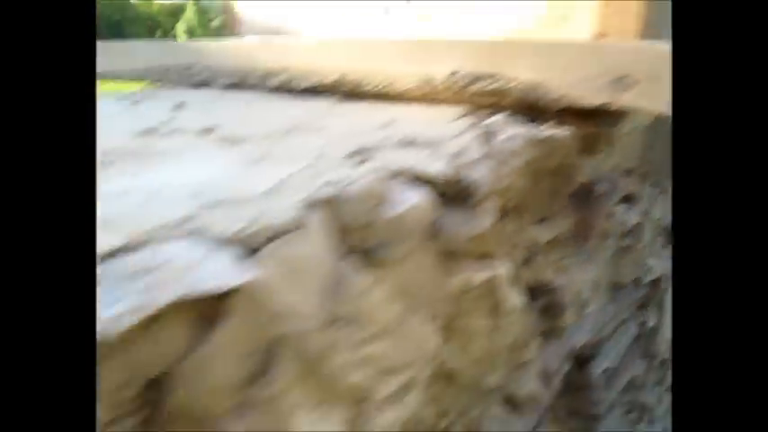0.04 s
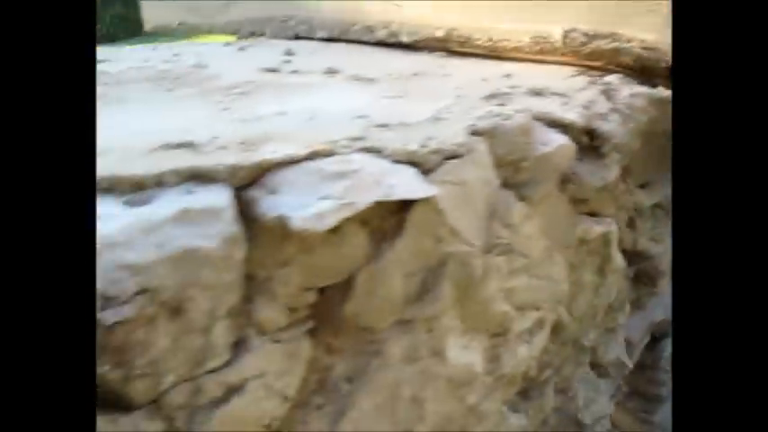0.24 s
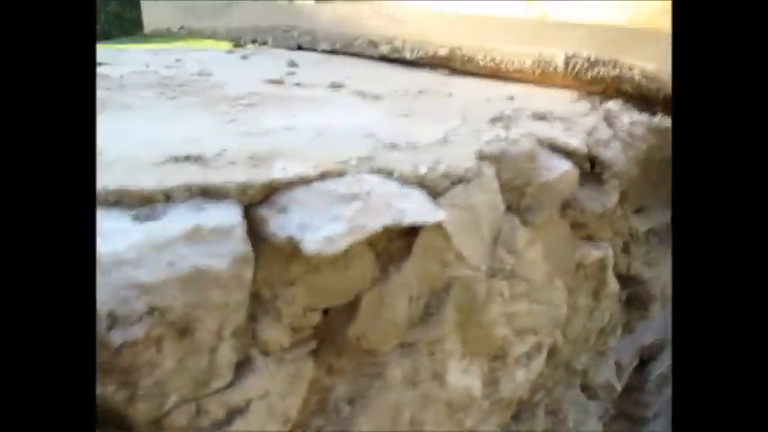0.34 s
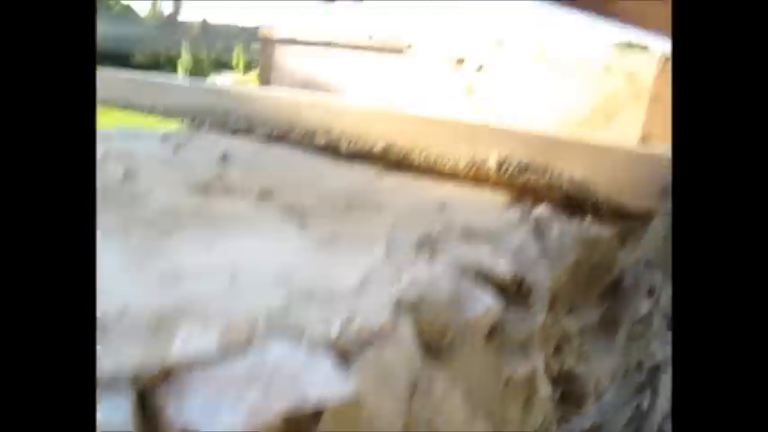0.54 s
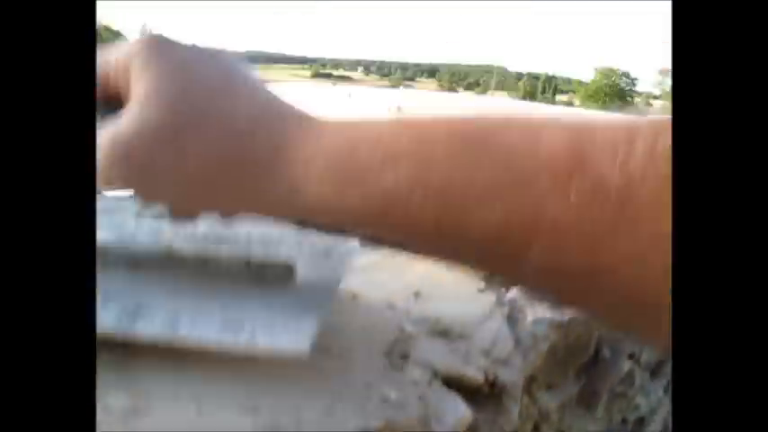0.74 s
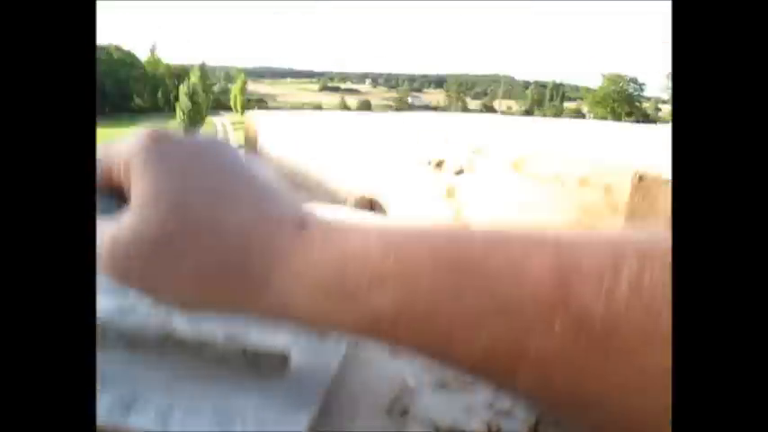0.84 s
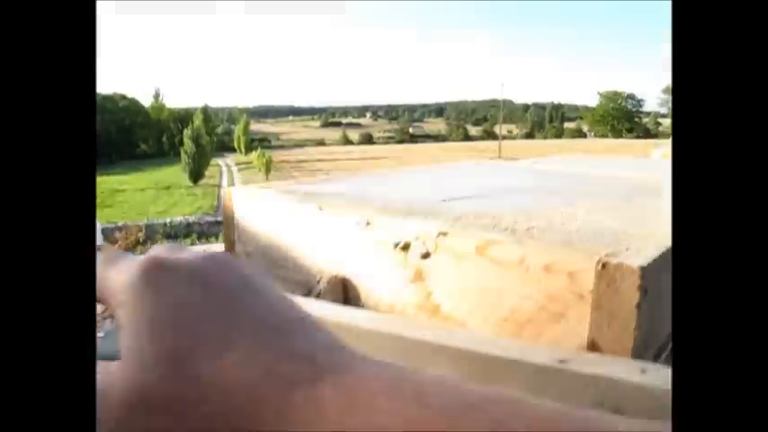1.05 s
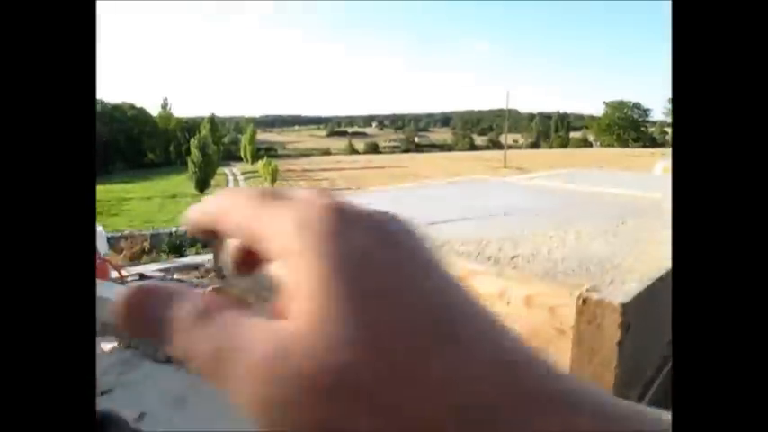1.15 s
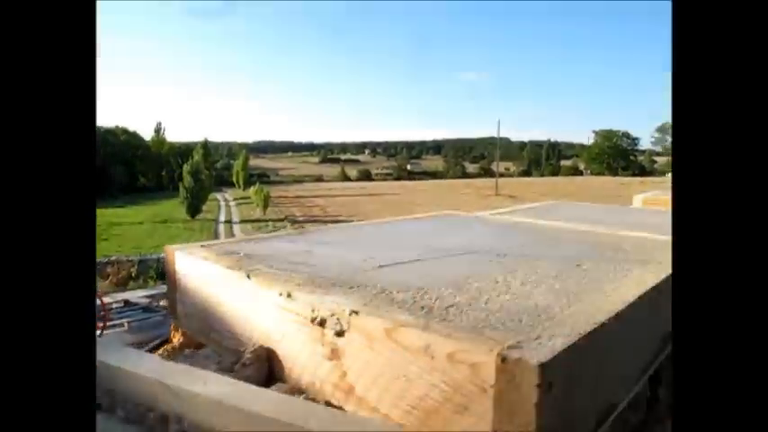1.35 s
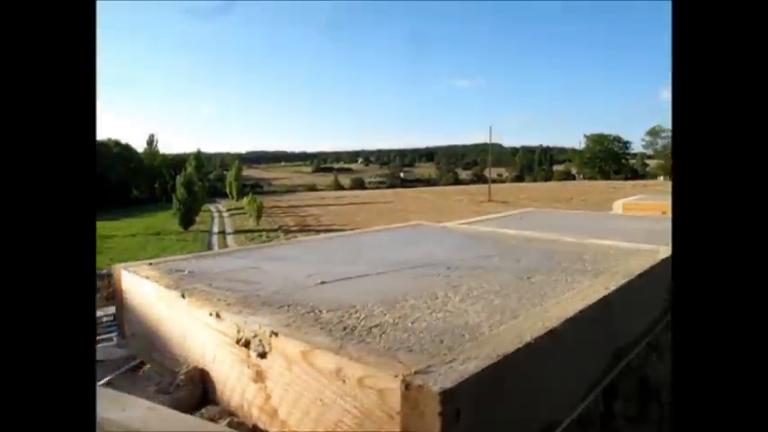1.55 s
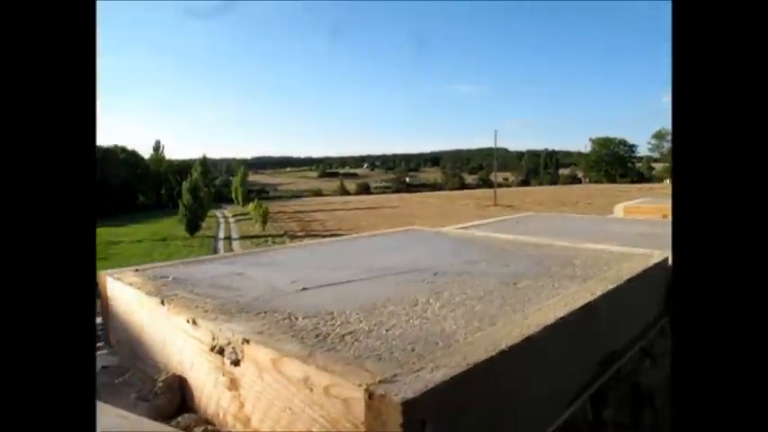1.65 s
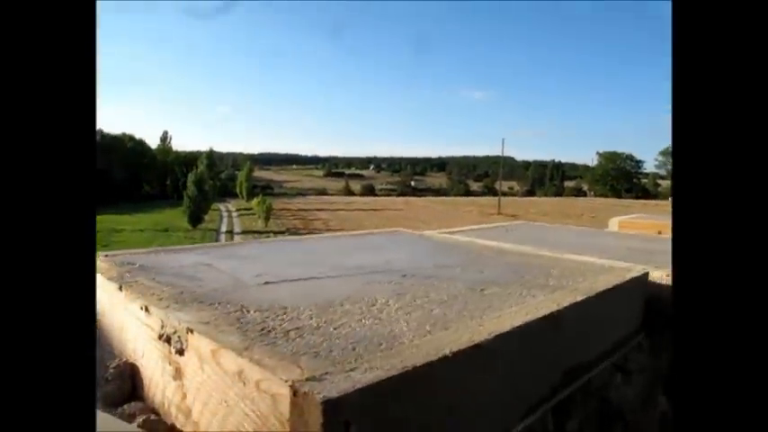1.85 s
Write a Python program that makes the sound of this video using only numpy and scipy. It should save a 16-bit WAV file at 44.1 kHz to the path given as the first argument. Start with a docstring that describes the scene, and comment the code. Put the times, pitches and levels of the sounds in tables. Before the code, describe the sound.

A board scrapes close by over a rough stone wall from about 0.2 to 0.4 seconds, crunching grit with tiny squeaks and a judder, then rings briefly. At 0.75 it lands with a sharp knock and rocks with fading clacks, stone ticks and soft bumps until 1.4. A distant bird chirps faintly near 1.6. A low outdoor hush and a very faint high whine run throughout.

```python
"""In quiet open country, a long straight-edged board is dragged over the rough top of a stone wall. Grit
crunches under it; the edge snags and squeaks, and the board judders and rings on as it lifts off. It is set
down with a sharp knock, shifts, and rocks to rest with dull clacks and soft bumps. Chips of stone tick, one far
bird chirps, and a faint high whine holds steady throughout."""
import sys
import numpy as np
from scipy import signal
from scipy.fft import rfft, irfft, next_fast_len
from scipy.io import wavfile
from scipy.ndimage import uniform_filter1d

SR = 44100
rng = np.random.default_rng(int(sys.argv[2]) if len(sys.argv) > 2 else 0)


def int16_out(signal):
    """Quantize to a 16-bit WAV file."""
    q = np.round(np.clip(np.atleast_2d(signal).T, -1, 1) * 32767)
    wavfile.write(sys.argv[1], SR, q.astype(np.int16))


N = 83790


def amp(db):
    """Turn decibels into a gain."""
    return 10 ** (np.asarray(db) / 20)

def unit(x):
    """Scale a sound to an average (rms) level of 1."""
    return x / np.sqrt(np.mean(x ** 2) + 1e-20)

def clock():
    """The time of each sample, in seconds."""
    return np.arange(N) / SR

def filtered(x, response):
    """Multiply each frequency in x by response(hz)."""
    size = next_fast_len(N + 8192)
    return irfft(rfft(x, size) * response(np.fft.rfftfreq(size, 1 / SR)), size)[:N]

def coloured(x, colour):
    """Shape x by a tone colour, a list of (Hz, dB) points; the result has level 1."""
    freqs, db = np.transpose(colour)
    def response(hz):
        bass_cut = np.minimum(1, hz / freqs[0]) ** 2
        return amp(np.interp(np.log(hz + 1), np.log(freqs), db)) * bass_cut
    return unit(filtered(x, response))

def noise():
    """White noise: an even hiss."""
    return rng.standard_normal(N)

def band(centre_hz, octaves):
    """Noise gathered around one pitch."""
    return unit(filtered(noise(), lambda hz: np.exp(-.5 * (np.log2((hz + 1) / centre_hz) / octaves) ** 2)))

def swell(peak_s, width_s):
    """A level that rises and falls in a bell shape."""
    return np.exp(-.5 * ((clock() - peak_s) / width_s) ** 2)

def decay(start, fade_s, hold_s=0):
    """A level that jumps up, holds, then dies. A fade time is how long a drop of 60 dB takes."""
    age = clock() - start
    return (age >= 0) * np.exp(-np.log(1000) * np.maximum(age - hold_s, 0) / fade_s)


# The air's tone colour. Each row: frequency in Hz, relative level in dB.
AIR_COLOUR = [(15, -25), (25, 0.5), (117, -6.5), (260, -4), (545, -6), (1650, -9), (4610, -13.5),
              (10100, -17), (16000, -34.5)]
def still_air():
    """The low, steady hush of open country."""
    return amp(-59.5) * coloured(noise(), AIR_COLOUR)

def whine(hz=5880):
    """One faint, steady high tone."""
    return amp(-76) * unit(np.sin(2 * np.pi * hz * clock()))

def grains(per_second=9000, spread=0.33):
    """Grit breaking: a stream of tiny cracks of uneven size."""
    size = rng.choice([-1, 1], N) * np.exp(spread * np.clip(noise(), -2, 2))
    return size * (rng.random(N) < per_second / SR)

# How loud the drag is as it goes. Each row: time in seconds, then grit, rasp and judder levels in dB.
STROKE_LEVELS = [(0.2122, -58.5, -71, -69), (0.211, -24.5, -36.5, -37), (0.219, -27.5, -41, -35.5),
                 (0.2245, -31.5, -39, -49.5), (0.23, -24, -29, -39.5), (0.248, -26.5, -45, -37.5),
                 (0.263, -29.5, -47, -46.5), (.290, -26.5, -33, -33.5), (0.304, -23.5, -34, -30),
                 (0.322, -22, -23.5, -33), (0.329, -28.5, -36.5, -36.5), (0.349, -21.5, -28.5, -28),
                 (0.371, -22.5, -31, -14), (0.373, -16.5, -27.5, -20.5), (0.387, -23, -30.5, -23),
                 (.393, -37.5, -34, -31.5), (0.424, -67, -59, -71.5)]
# Tone colours of the drag, highest first. Each row: frequency in Hz, relative level in dB.
GRIT_COLOUR = [(2000, -13), (4200, -9.5), (5200, -7.5), (7000, -3), (9500, 2.5), (10600, -3.5),
               (11800, -19), (12600, -12), (16000, -20.5)]
RASP_COLOUR = [(1200, -7), (1500, -7.5), (1950, -16), (2600, 1.5), (3000, -9), (3550, 1.5), (4200, -2),
               (5000, -21.5), (9000, -41.5)]
JUDDER_COLOUR = [(130, -71), (260, -29), (400, -22.5), (580, -9), (780, -12.5), (1000, -8.5), (1220, 5.5),
                 (1380, -13), (1650, -33), (3000, -36)]
RUMBLE_COLOUR = [(25, -17.5), (100, -10.5), (230, -0.5), (480, 1), (900, -23), (2000, -42.5)]
def scrape():
    """Grit breaks under the moving edge, which snags while the board judders and rings."""
    times, *levels = np.transpose(STROKE_LEVELS)
    grit, rasp, judder = [amp(np.interp(clock(), times, db, left=-120, right=-120)) for db in levels]
    jerk = amp(2.5 * unit(uniform_filter1d(noise(), size=130)))  # a fast flicker in level
    out = jerk * (grit * coloured(grains(), GRIT_COLOUR) + rasp * coloured(grains(), RASP_COLOUR))
    out += judder * coloured(grains(), JUDDER_COLOUR)
    usual_grit = np.median(grit[grit > grit.max() / 10])
    rumble = amp(-50.5) * np.sqrt(np.minimum(grit / usual_grit, 1))
    out += rumble * coloured(noise(), RUMBLE_COLOUR)
    return out + snags() + board_ring(judder)

# The tones of the board held in the air. Each row: pitch in Hz, relative level in dB, fade in seconds.
HELD_TONES = [(240, -20, .8), (581, -15, .45), (856, -2, .46), (921, -11, .48), (1157, -5, .35),
              (1206, -5, .27), (1270, -4, .2), (1453, -9, .46), (1502, -7, .32), (1906, -12, .27),
              (3305, -8, .15), (3480, -2, .1), (3700, 2, .085), (4199, -8, .12)]
def board_ring(judder, level_db=-31.5):
    """The judder feeds the board's own tones, which ring on after it lifts off."""
    out = np.zeros(N)
    for hz, db, fade_s in HELD_TONES:
        kept_per_sample = np.exp(-2 * np.log(1000) / (fade_s * SR))
        energy = signal.lfilter([1], [1, -kept_per_sample], judder ** 2)
        tone = np.sin(2 * np.pi * (hz * clock() + rng.random()))
        out += amp(level_db + db) * np.sqrt(energy / energy.max()) * tone
    return out

# A snag's tone colour. Each row: frequency in Hz, relative level in dB.
SNAG_COLOUR = [(800, -29.5), (1800, -17), (2800, -26.5), (5000, -15), (7200, 0.5), (10200, 1.5),
               (11800, -11), (12800, -13), (16000, -16.5)]
# The snags. Each row: time in seconds, level in dB, width in seconds, rasp relative to the crack in dB.
EDGE_SNAGS = [(0.2355, -21, 0.0018, -17), (0.25, -18, 0.0014, -16.5), (0.2574, -23.5, 0.0019, -2.5),
              (0.2742, -22, 0.0015, -9.5), (0.306, -11.5, .0008, -9.5), (0.323, -16.5, .0018, -3),
              (0.3263, -13, 0.00051, -19), (0.375, -21.5, 0.00064, -9.5), (.379, -19.5, .0011, -11.5),
              (.3862, -24.5, 0.0031, -5)]
def snags():
    """The edge catches on large grains, each giving a crack with some rasp in it."""
    crack, rasp = coloured(noise(), SNAG_COLOUR), coloured(noise(), RASP_COLOUR)
    return sum(amp(db) * swell(at, width_s) * (crack + amp(rasp_db) * rasp)
               for at, db, width_s, rasp_db in EDGE_SNAGS)

# The squeaks. Each row: time in seconds, level in dB, pitch in Hz.
EDGE_SQUEAKS = [(.2735, -27, 13500), (.3075, -27, 13000), (.326, -20, 10100), (.3735, -19, 7050)]
def squeaks():
    """Some snags give a shrill squeak as they slip."""
    return sum(amp(db) * swell(at, width_s=.0012) * band(hz, octaves=.063) for at, db, hz in EDGE_SQUEAKS)

def swish():
    """A faint hiss swells before the knock."""
    return amp(-57) * swell(peak_s=.699, width_s=.026) * coloured(noise(), GRIT_COLOUR)

# The ticks. Each row: start in seconds, level in dB, pitch in Hz, width in octaves, fade in seconds.
CHIP_TICKS = [(.727, -41.5, 925, 1, 0.016), (0.898, -24.5, 4200, .36, 0.011),
              (1.1028, -28.5, 8040, 0.21, 0.0097), (1.796, -48.5, 1430, 0.43, 0.019)]
def ticks():
    """Loose chips of stone click once without ringing."""
    return sum(amp(db) * decay(start, fade_s) * band(hz, octaves)
               for start, db, hz, octaves, fade_s in CHIP_TICKS)

def struck(start, tones, detune=.004):
    """A hit sets the board's tones ringing; they shift a little with the point of contact."""
    t, out = clock(), np.zeros(N)
    ringing = (t >= start) & (t < start + .3)
    age = t[ringing] - start
    for hz, db, fade_s in tones:
        level = amp(db + rng.normal(0, 1.37)) * np.exp(-np.log(1000) * age / fade_s)
        out[ringing] += level * np.sin(2 * np.pi * (hz * rng.normal(1, detune) * age + rng.random()))
    return out

def softened(ring, start, bright_hz, rise_s=.00094):
    """A hit takes a moment to build up, and its treble falls away above bright_hz."""
    rise = 1 - np.exp(-np.maximum(clock() - start, 0) / rise_s)
    return filtered(ring * rise, lambda hz: 1 / np.sqrt(1 + (hz / bright_hz) ** 5))

# The tones of the board lying on the wall. Each row: pitch in Hz, relative level in dB, fade in seconds.
LYING_TONES = [(690, -16, .11), (852, -12, .13), (1178, -2, .15), (1273, -1, .13), (1545, -10, .12),
               (1712, -4, .12), (2164, -7, .05), (2538, -5, .11), (2775, 1.5, .07), (3303, -1, .09),
               (3385, 0, .07), (3450, 0, .06), (3612, -7, .11), (3790, -8, .11), (4355, -10, .08)]
# Tone colours of the knock and the crushed grit. Each row: frequency in Hz, relative level in dB.
KNOCK_COLOUR = [(60, -38), (450, -38), (650, -12.5), (1250, -2.5), (1800, -11), (2500, -7), (3500, 4),
                (4300, -7), (7000, -13), (12000, -30)]
CRUNCH_COLOUR = [(800, -37), (3000, -4), (5500, -5), (7600, 1), (10000, -2), (11800, -16.5), (13000, -19),
                 (16000, -27)]
# The board strikes the wall. Each row: start in seconds, relative ring level in dB, brightness in Hz,
# crunch level in dB, time the crunch holds in seconds.
WALL_KNOCKS = [(.752, -21.5, 9000, -19.5, 0.006), (.756, -19.5, 4630, -34.5, 0.0057),
               (0.779, -30.5, 4560, -41, 0.011), (0.798, -36, 4500, -40, 0.0054),
               (.805, -29.5, 4470, -38.5, 0.0053), (0.8603, -36, 5500, -39.5, .002),
               (.884, -33, 5000, -37.5, 0.0081), (0.9, -30.5, 4340, -39.5, 0.01),
               (0.919, -29.5, 1760, -46, 0.01), (0.944, -28, 1700, -45.5, 0.006)]
def knocks():
    """Each knock rings the board and crushes a little grit."""
    out = np.zeros(N)
    crunch = coloured(grains(), CRUNCH_COLOUR)
    for start, db, bright_hz, crunch_db, hold_s in WALL_KNOCKS:
        body = amp(-2.5) * decay(start, fade_s=.075) * coloured(noise(), KNOCK_COLOUR)
        tones = amp(-8.5) * struck(start, LYING_TONES)
        out += amp(db) * softened(body + tones, start, bright_hz)
        out += amp(crunch_db) * decay(start, fade_s=.031, hold_s=hold_s) * crunch
    return out

# The bumps. Each row: start in seconds, level in dB, pitch in Hz.
SOFT_BUMPS = [(0.895, -50.5, 270), (1.381, -57.5, 205), (1.443, -56.5, 420)]
def bumps(rise_s=.011):
    """The board gives dull, soft bumps as it settles."""
    out = np.zeros(N)
    for start, db, hz in SOFT_BUMPS:
        progress = np.maximum(clock() - start, 0) / rise_s  # loudest at 1
        out += amp(db) * progress * np.exp(1 - progress) * band(hz, octaves=.53)
    return out

# The tones of the rocking board. Each row: pitch in Hz, relative level in dB, fade in seconds.
ROCKING_TONES = [(744, -17, 0.14), (955, -17, 0.24), (1136, -6.5, 0.1), (1210.6, 0, 0.12),
                 (1331, -6.5, 0.097), (1406, -7, 0.13), (1527, -12.5, 0.23), (1686, -9.5, 0.16),
                 (1870, -9.5, 0.074), (1990, -5.5, .12), (2150, -11.5, 0.065), (2370, -8, 0.085),
                 (2970, -8, 0.12), (3580, -11.5, 0.11), (3810, -8.5, .07)]
# A clack's tone colour. Each row: frequency in Hz, relative level in dB.
CLACK_COLOUR = [(100, -41), (500, -15), (750, -8.5), (1000, -5), (1280, -3.5), (1650, -2.5), (2300, -1),
                (2650, -4.5), (3100, -3), (4200, -3.5), (9000, -10)]
# The clacks. Each row: start in seconds, relative level in dB, brightness in Hz.
ROCKING_CLACKS = [(.901, -26.5, 1550), (.944, -34, 1600), (.973, -29.5, 1860), (1.035, -33.5, 1860),
                  (1.046, -45, 1600), (1.114, -31.5, 3000), (1.148, -39, 2300), (1.18, -43.5, 2300),
                  (1.192, -34.5, 2380), (1.217, -35, 2300), (1.237, -41.5, 2166), (1.257, -41.5, 2130),
                  (1.277, -47, 2000), (1.298, -44, 1890), (1.363, -43.5, 1594)]
def clatter():
    """The board rocks to rest on its far end; each clack's treble runs along it ahead of the bass."""
    out = np.zeros(N)
    for start, db, bright_hz in ROCKING_CLACKS:
        body = amp(1) * decay(start, fade_s=.055) * coloured(noise(), CLACK_COLOUR)
        tones = amp(-3.5) * struck(start, ROCKING_TONES)
        out += amp(db) * softened(body + tones, start, bright_hz)
    travel_s = .0043  # time a 1000 Hz bending wave takes to run along the board
    return filtered(out, lambda hz: np.exp(-4j * np.pi * travel_s * np.sqrt(1000 * hz)))

def bird():
    """One short chirp from far away."""
    return amp(-63) * swell(peak_s=1.574, width_s=.011) * band(4640, octaves=.055)


def scene():
    """The board close by, a weak echo from the stonework, and the country around."""
    near = scrape() + squeaks() + knocks() + clatter() + ticks() + bumps()
    tail = noise() * decay(start=.0016, fade_s=.35)
    echo = signal.fftconvolve(near, tail / np.linalg.norm(tail))[:N]
    return (near + amp(-27) * echo + bird() + swish() + still_air())[None]

def record(dry):
    """Add the whine, make a narrow dip in the treble and cut off the very top."""
    dip_hz, dip_width_hz, dip_db, top_hz = 11650, 180, -12, 16000
    dip = lambda hz: amp(dip_db * np.exp(-.5 * ((hz - dip_hz) / dip_width_hz) ** 2))
    low_pass = lambda hz: 1 / (1 + (hz / top_hz) ** 200)
    return filtered(dry[0] + whine(), lambda hz: dip(hz) * low_pass(hz))[None]


dry = scene()
out = record(dry)
int16_out(out)
```